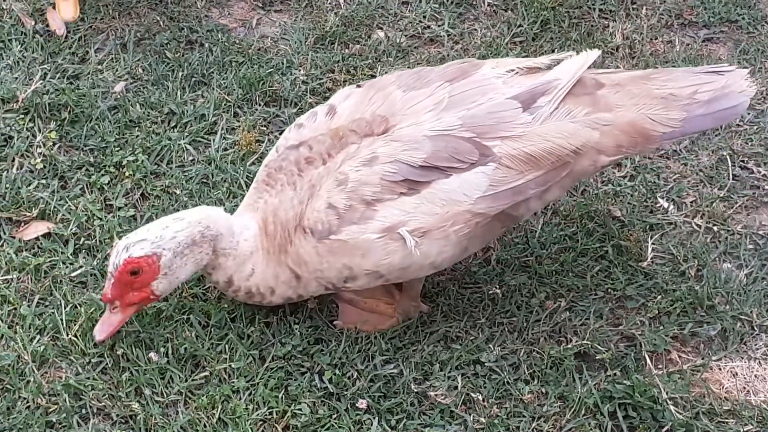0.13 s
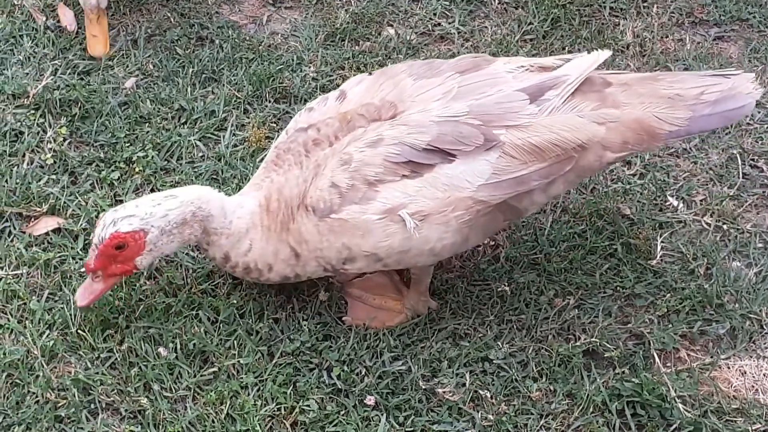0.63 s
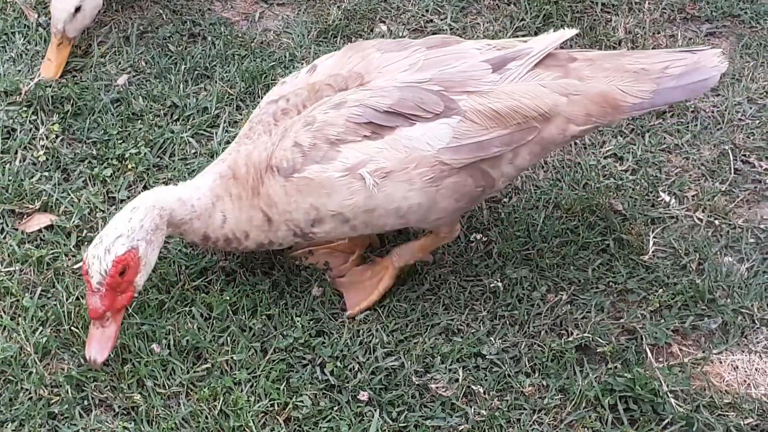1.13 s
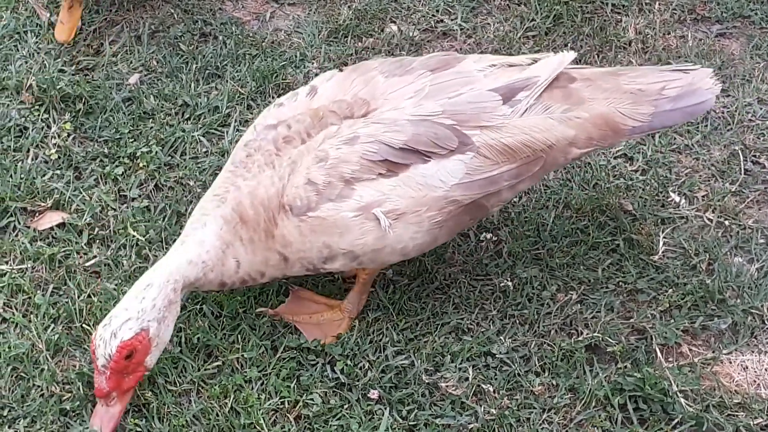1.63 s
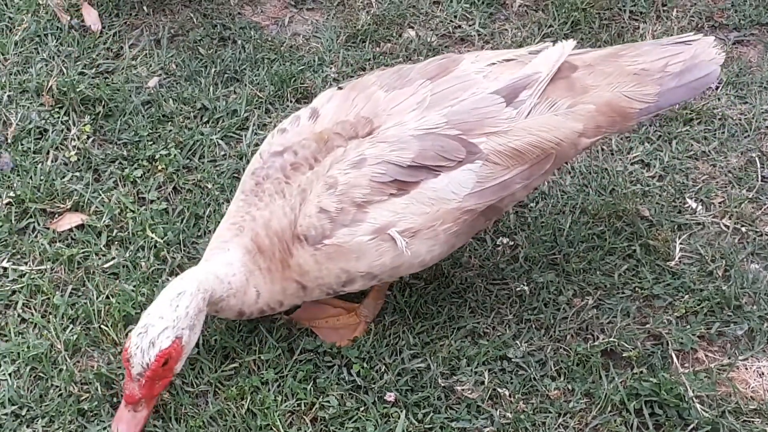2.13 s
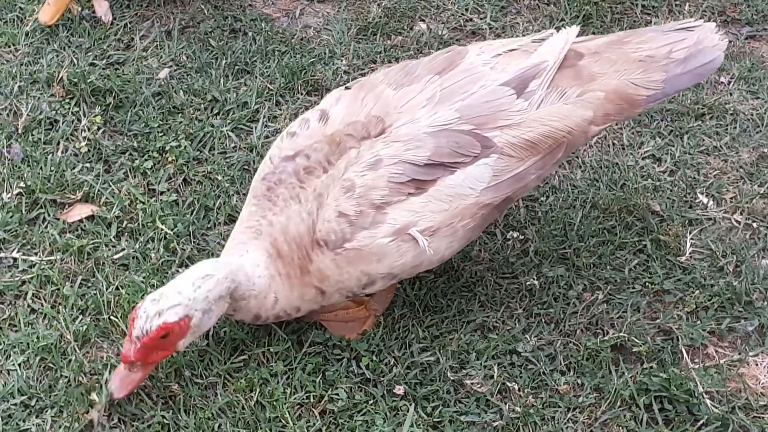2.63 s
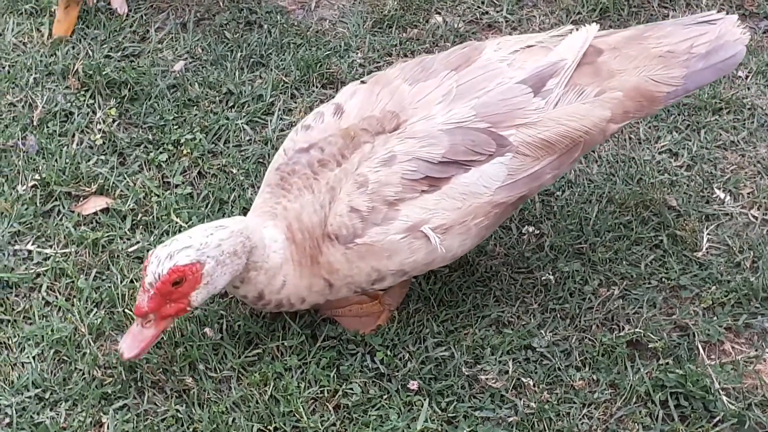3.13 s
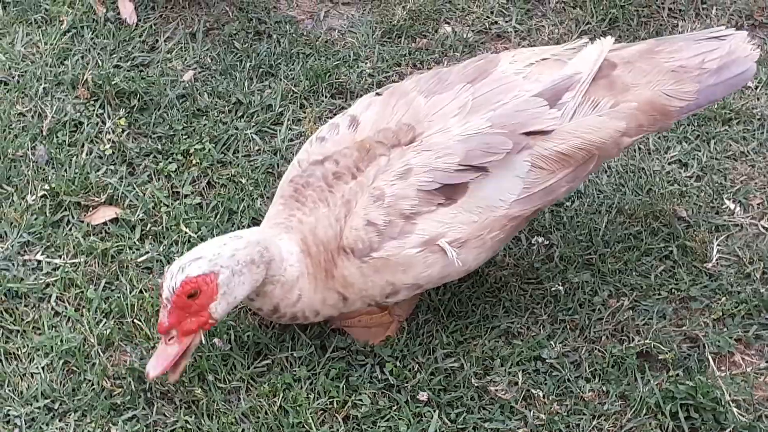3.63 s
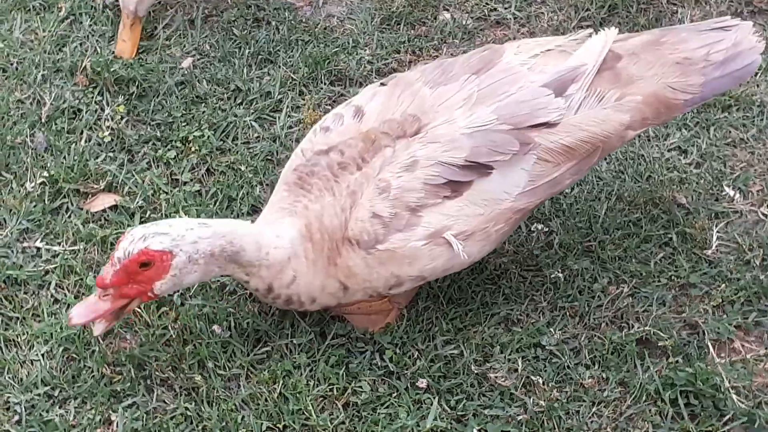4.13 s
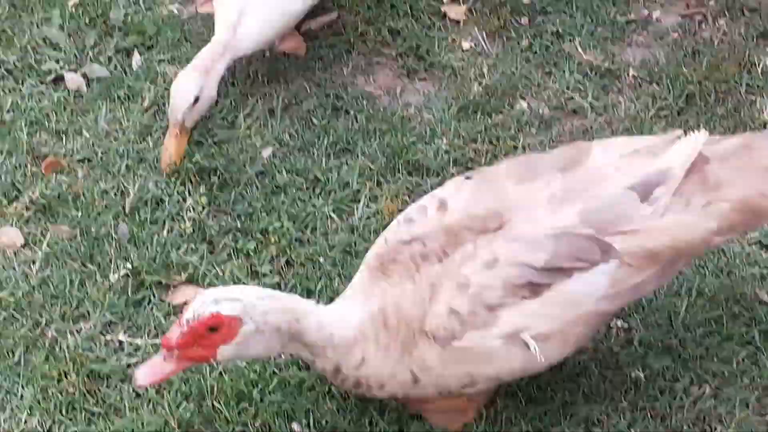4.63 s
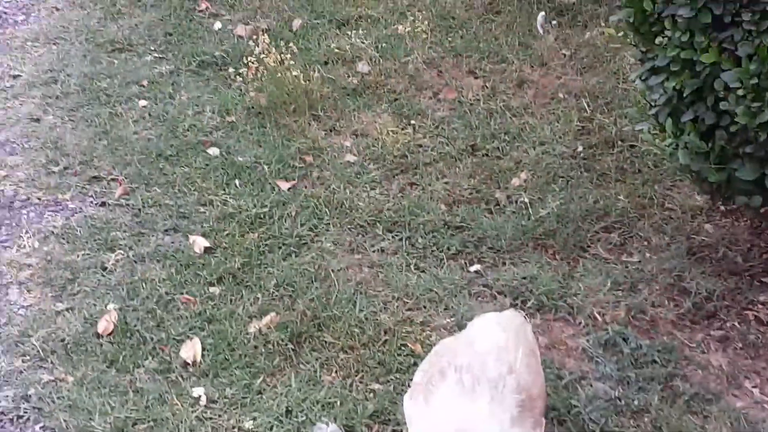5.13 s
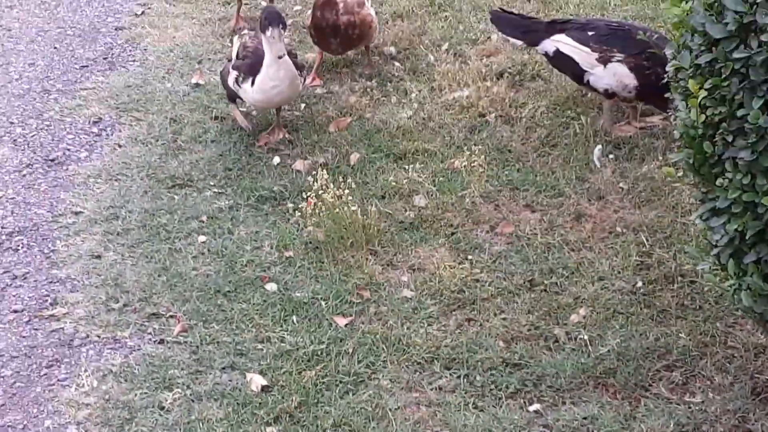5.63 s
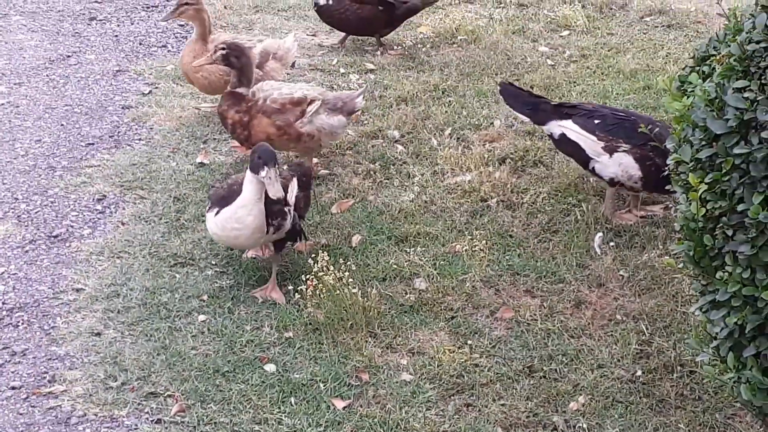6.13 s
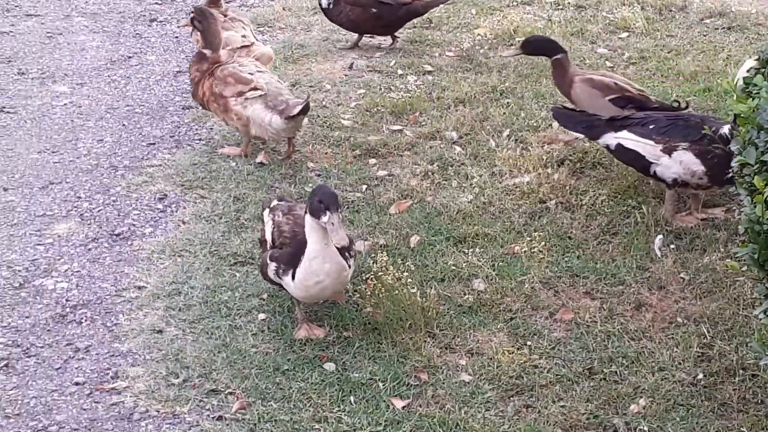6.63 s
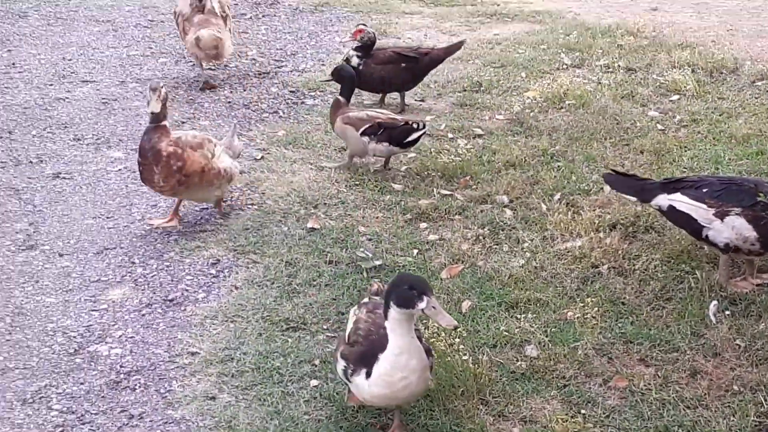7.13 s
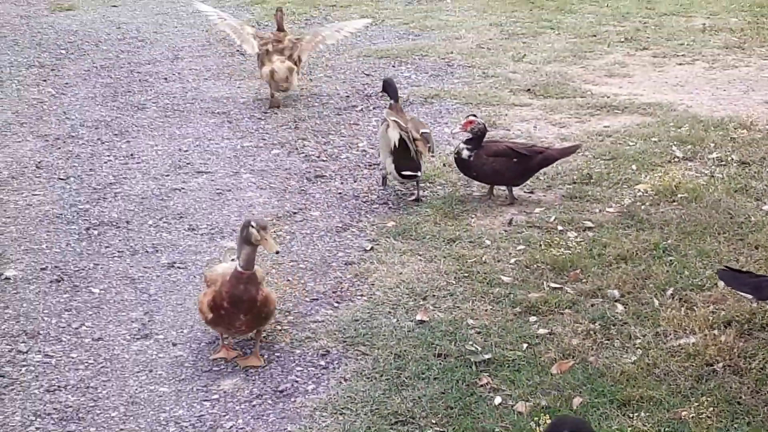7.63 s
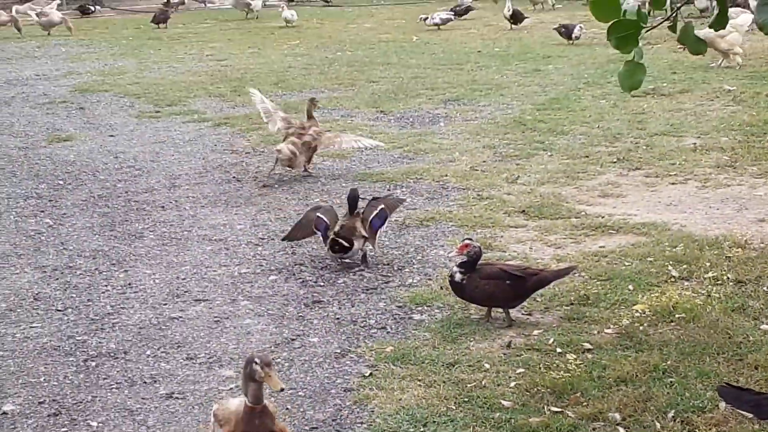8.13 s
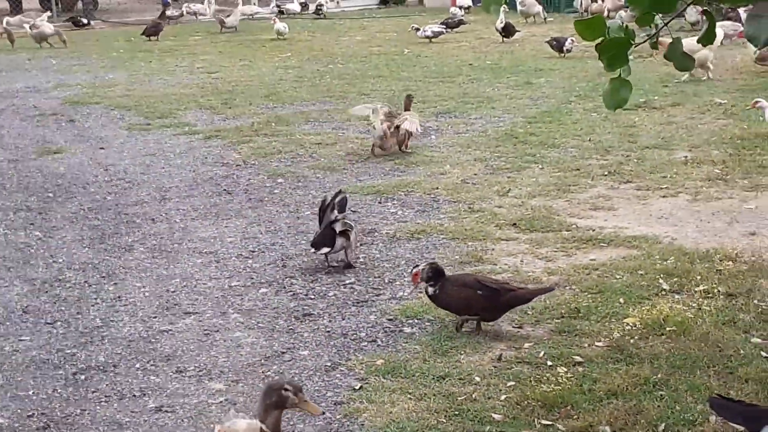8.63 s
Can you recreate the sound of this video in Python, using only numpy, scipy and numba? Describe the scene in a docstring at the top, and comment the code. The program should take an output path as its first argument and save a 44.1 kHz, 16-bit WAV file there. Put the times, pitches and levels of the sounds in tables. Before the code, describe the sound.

Wind buffets the microphone in low thumps while ducks rasp hoarsely and quack on a lawn, then two louder nasal quacks ring out.

```python
"""Ducks on a lawn: drakes rasp softly, near and far, and two hens quack, one near and one far.
Membrane pulses and gated air ring the throat and bill of each duck; grass, bushes and fences scatter the calls.
Gusts buffet the two microphone ports separately, as moving bands of noise and single pressure lumps.
Grass and bills tick in short crackles with a bright ring, a small bird chips in warbled sines, a dove coos
in wavering ones. Behind them far traffic swells under the hiss of leaves, both shaped from noise."""
import sys
import numpy as np
from scipy import signal
from scipy.fft import rfft, irfft, next_fast_len
from scipy.io import wavfile
from scipy.ndimage import uniform_filter1d
from numba import njit

SR = 44100
rng = np.random.default_rng(int(sys.argv[2]) if len(sys.argv) > 2 else 0)


def bounce(signal):
    """Save signal as a 16-bit WAV file at the path given by the first command-line argument."""
    frames = np.transpose(np.atleast_2d(signal))
    limited = np.clip(frames, -1, 1)
    pcm = np.round(limited * 32767).astype(np.int16)
    wavfile.write(sys.argv[1], SR, pcm)


def volts_from_db(level):
    """Convert decibel levels to linear amplitude ratios."""
    exponent = np.asarray(level, float) / 20
    return 10 ** exponent


N = 386668
TIME = np.arange(N) / SR
SIDES = np.array([[1], [-1]])  # left port, right port

# quacks of the near and the far hen:
# (full voice from [s], hold [s], level [dB], throat [Hz], treble against the throat [dB], pitch [Hz])
NEAR_QUACKS = [(1.215, 0.029, -38.5, 1510, -10.5, 215.8), (1.635, 0.045, -34, 1600, -12.5, 227),
               (3.76, 0.013, -35.5, 1510, -16, 218.3), (3.915, 0.036, -37, 1590, -10, 227),
               (4.045, 0.021, -35.5, 1500, -9.5, 216.2), (4.3, 0.0596, -26, 1490, -13.5, 226.6),
               (4.556, 0.0637, -27, 1480, -14, 226.3)]
FAR_QUACKS = [(7.048, 0.064, -22, 1670, -17.5, 256.8), (7.324, .068, -23, 1640, -24, 254.7)]
# voice of the far hen: (time [s], weakening of every second pulse [0-1], roughness [0-1])
FAR_VOICING = [(7.04, .2, .5), (7.062, .55, .3), (7.08, .06, .04), (7.115, .03, .05), (7.13, 0, .4),
               (7.31, 0, .4), (7.33, .1, .12), (7.36, .03, .04), (7.39, .1, .08), (7.42, .2, .6)]
# voice of the near hen: (time [s], weakening of every second pulse [0-1])
NEAR_PAIRING = [(4.1, .5), (4.29, .25), (4.34, .6), (4.54, .1), (4.575, .25), (4.59, .6)]
# near rasps, and at 4.2 s one short quack of the near hen voiced like them: (full voice from [s], hold [s],
# level [dB], throat [Hz], treble against the throat [dB])
RASPS = [(.855, 0.022, -41, 1850, -6), (1.116, 0.039, -44.5, 1820, -4.5), (1.4, 0.025, -38.5, 1770, -10.5),
         (1.802, 0.031, -43.5, 1900, -6), (2.035, 0.042, -53, 2080, -4), (2.278, 0.052, -49.5, 2060, -7.5),
         (2.395, 0.039, -52.5, 1720, -21), (2.582, 0.044, -47, 2090, -5.5), (2.632, 0.04, -42.5, 1840, -6),
         (2.832, 0.086, -45, 1970, -7), (3.133, 0.076, -49, 1985, -2), (3.357, 0.067, -39, 1904, -8),
         (3.44, 0.058, -48.5, 2200, 0.5), (3.66, 0.072, -42, 2040, -6), (3.88, 0.1, -40.5, 1953, -7.5),
         (4.11, 0.033, -49.5, 2114, -2.5), (4.2, 0.053, -40.5, 1810, -8.5),
         (4.507, 0.041, -44, 1700, -15.5), (8.09, 0.022, -46, 1920, -16)]
# far rasps, with the hoarse air that leads into and trails after the far quacks:
# (full voice from [s], hold [s], level [dB], throat [Hz], treble against the throat [dB])
DISTANT_RASPS = [(5.072, 0.021, -49.5, 1607, -9.5), (5.21, .07, -64.5, 2320, -10.5),
                 (5.292, 0.036, -55.5, 1610, 2.5), (5.612, 0.033, -58.5, 1590, 0.5),
                 (6.2, 0.036, -60, 1150, -20), (6.385, .035, -56, 1050, -18), (7.0, 0.04, -45.5, 1973, -21),
                 (7.02, 0.083, -43, 997, -29), (7.125, .04, -42, 1800, -15),
                 (7.298, .016, -42.5, 1780, -21), (7.41, 0.056, -47, 1750, -12),
                 (7.858, 0.025, -51, 1620, -5.5), (8.375, 0.035, -53.5, 1850, -3)]
# resonances of each voice beside the main throat band, low and high:
# (centre [Hz], width [Hz], level [dB])
NEAR_LOW = [(2350, 380, -7), (1880, 380, -5), (1300, 220, -2), (240, 150, -22), (850, 600, -18)]
NEAR_HIGH = [(3650, 900, -2), (4400, 1500, 0), (5600, 900, 0), (6200, 700, 0), (11500, 6000, -30)]
FAR_LOW = [(2330, 130, -19.5), (1350, 130, -5), (260, 215, -26), (540, 300, -28.5), (820, 300, -30)]
FAR_HIGH = [(3900, 930, -1), (4440, 720, 1), (4800, 820, -4.5)]
DRAKE_LOW = [(2350, 400, -2), (1600, 300, -5)]
DRAKE_HIGH = [(3200, 430, 0.73), (4080, 307, 2), (5000, 1370, -0.25), (5630, 700, -1.7)]
DISTANT_HIGH = [(1960, 260, 0), (2550, 320, 3), (3050, 400, -2)]
# how each voice shapes a call: (attack [s], release [s], drop at both ends [dB], sag while held [dB],
#  throat rise across the call [share], pitch fall in the release, half of it at the onset [share])
NEAR_HEN = (0.03, 0.042, 18.13, 1.4, 0.066, 0.022)
FAR_HEN = (0.016, 0.036, 15, -2.5, -.02, 0.82)
DRAKE = (.018, 0.06, 15.4, 5, 0.06, .01)
FAR_DRAKE = (0.022, 0.059, 26, 1.3, 0.019, .01)
# gusts that buffet one port: (start [s], hold [s], level [dB], port [0 left, 1 right])
GUSTS = [(0.0, 0.09, -20, 1), (0.01, 0.078, -40, 0), (0.491, 0.086, -34, 0), (.56, 0.021, -33, 1),
         (0.706, 0.017, -42, 1), (0.829, 0.026, -38, 0), (0.883, 0.0067, -25, 1), (1.003, 0.072, -26.5, 1),
         (1.132, 0.16, -24, 0), (1.133, 0.19, -30.5, 1), (1.351, 0.063, -26.5, 0), (1.367, 0.031, -30, 1),
         (1.447, 0.053, -21, 0), (1.5, 0.14, -31, 1), (1.56, 0.12, -32, 0), (1.626, 0.051, -27, 1),
         (1.842, 0.1, -36, 1), (2.203, 0.1, -40, 1), (2.363, 0.22, -28, 1), (2.583, 0.089, -20, 1),
         (2.697, 0.062, -33.5, 1), (3.097, 0.23, -30, 0), (3.334, 0.08, -20.5, 1), (3.386, 0.066, -30, 0),
         (3.511, 0.061, -32, 1), (3.581, 0.13, -26.5, 0), (3.742, 0.23, -27, 0), (3.796, 0.153, -19.5, 1),
         (3.992, 0.097, -22.5, 0), (4.012, 0.076, -17.5, 1), (4.128, 0.0328, -19, 0),
         (4.116, 0.134, -21.5, 1), (4.22, 0.22, -28.5, 0), (4.323, 0.12, -30.5, 1),
         (4.542, 0.0395, -34.5, 1), (4.555, 0.032, -44, 0), (4.74, 0.058, -37.5, 1),
         (4.746, 0.0106, -37.5, 0), (4.862, 0.12, -39, 0), (4.857, 0.11, -36.5, 1), (5.099, 0.062, -40, 1),
         (5.39, 0.009, -32.5, 1), (5.827, 0.09, -36.5, 0), (5.871, 0.059, -32.5, 1),
         (5.443, 0.085, -48.5, 1), (5.988, 0.0263, -31.5, 0), (5.998, 0.0426, -36.5, 1),
         (6.213, 0.043, -40.5, 0)]
# strongest eddies: (time [s], level [dB], pitch [Hz], port [0 left, 1 right])
POPS = [(0.036, -4, 253.4, 1), (0.077, -9, 267, 1), (0.098, -8.5, 328, 1), (1.039, -10.5, 289, 1),
        (1.167, -12, 250, 0), (1.263, -7, 297, 0), (1.29, -10.5, 272, 0), (1.389, -13.5, 159, 0),
        (1.451, -8.5, 200, 0), (1.478, -11, 147, 0), (2.522, -15.5, 246, 1), (2.66, -13, 216, 1),
        (3.193, -17, 253, 0), (3.339, -3, 250, 1), (3.415, -13.5, 226, 1), (3.84, -7.5, 207, 1),
        (3.888, -8.5, 325, 1), (3.957, -6, 288, 1), (4.011, -16, 242, 0), (4.041, -4, 291.4, 1),
        (4.058, -10, 186, 1), (4.153, -5, 237, 0), (4.186, -3.5, 261, 1), (4.205, -4, 290, 1),
        (4.216, 4.5, 296, 1), (4.239, -4, 266, 1), (4.27, -17, 330, 1), (4.385, -9, 217, 1),
        (5.879, -21, 184, 1), (5.896, -16.5, 138, 0)]
# light breeze between the gusts: (time [s], left port level [dB], right port level [dB])
BREEZE = [(0, -52, -57.5), (.9, -45, -42.5), (2, -50.5, -44.5), (3, -49.5, -49.5), (4.6, -48, -40),
          (5.2, -68, -52), (5.7, -65, -59.5), (6.2, -67, -53), (6.6, -50.5, -56), (7, -62, -59.5),
          (7.8, -46, -54), (8.3, -57, -51.5), (8.77, -81, -48)]
# dry ticks: (time [s], level [dB], ring [Hz], left minus right [dB])
TICKS = [(0.3167, -50, 4600, -7), (2.6286, -31.5, 15700, 9), (2.6766, -31, 6260, 8),
         (2.6794, -32.5, 15800, -8), (2.7225, -41.5, 4780, -2), (3.175, -42, 5540, 4),
         (5.6007, -49.5, 3130, 11.5), (5.947, -38, 3830, -0.5), (6.1448, -45, 4300, 0),
         (6.1799, -44.5, 3850, -1), (6.2542, -49, 4470, 1.5), (6.3642, -39, 4580, -2),
         (6.469, -47, 4800, -4), (6.5866, -27, 14800, -1), (6.5964, -32, 4700, -0.5),
         (6.6061, -33, 5170, 9), (6.785, -46, 3200, 12.5), (6.8404, -45, 5000, 3), (7.7255, -50.5, 4440, 2),
         (7.9424, -51, 4270, 6), (8.33, -43, 6960, 9)]
# small bird: (time [s], level [dB], pitch [Hz], left minus right [dB])
CHIPS = [(0.408, -56, 7380, 10), (1.111, -56, 7500, 10), (2.7227, -57, 6900, 24), (3.2195, -58, 7600, 12),
         (3.6853, -52, 7760, 16), (3.7594, -61, 7680, 14), (4.472, -54.5, 7470, 6), (6.314, -65.5, 7500, 4),
         (8.047, -57.5, 7660, 9), (8.5714, -56, 7810, 7)]
# dove: (start [s], length [s], first pitch [Hz], last pitch [Hz], level [dB])
COOS = [(0.147, 0.31, 225, 235.5, -60), (2.11, 0.32, 215, 225.3, -61), (4.808, 0.13, 334, 310.4, -52),
        (7.497, 0.182, 309.7, 325.3, -51.5), (7.704, 0.064, 322, 267, -51)]
# far traffic: (time [s], level [dB])
TRAFFIC = [(0.0, -54), (0.34, -59), (1.17, -55), (2.15, -60.5), (4.2, -58.5), (5.08, -63), (6.93, -56),
           (7.2, -50.5), (7.74, -55), (8.77, -46)]
# spectrum of the traffic: (frequency [Hz], relative level per Hz [dB])
TRAFFIC_COLOUR = [(150, 3.5), (260, 8), (286, 5), (320, 5.5), (633, 3), (934, 2), (1070, 4), (1210, -2.5),
                  (1650, -2), (2500, -12.5), (3250, -40), (5500, -120)]
# hiss of the leaves: (time [s], level [dB])
YARD_LEVEL = [(0, -55), (.6, -57), (1.05, -55.5), (1.5, -52), (2.1, -58), (2.7, -52), (3.1, -55.5),
              (3.58, -56.5), (4.0, -58), (4.45, -54), (4.9, -56.5), (5.5, -56.5), (6.1, -55), (6.6, -55.5),
              (7.2, -52.5), (7.9, -55.5), (8.77, -54.5)]
# spectrum of that hiss: (frequency [Hz], relative level per Hz [dB])
YARD = [(100, -54), (170, 0), (337, 5.5), (721, -8), (808, -22), (1050, -24), (1300, -5.5), (1830, -6),
        (3120, -8), (5110, -7), (8220, -17), (9040, -35.5), (14300, -17), (16000, -16)]
# thin high hiss of leaves or insects: (time [s], level [dB])
RUSTLE = [(0.0, -70), (0.17, -74), (0.9, -73.5), (1.39, -67), (1.88, -64.5), (2.07, -71), (2.34, -75),
          (2.66, -64.5), (4.25, -73.5), (5.1, -72.5), (5.3, -60), (5.52, -70), (6.13, -70.5), (7.06, -65),
          (7.72, -70), (8.6, -66.5), (8.77, -68)]

# side pocket and pipe of the windpipe, top of the bill's body sound
POCKET_HZ, POCKET_WIDTH_HZ, BILL_TOP_HZ, PIPE_HZ = 2950, 800, 2750, 1200
ARCH_DB, ARCH_SHARE = 0.87, .012  # level and pitch crest in the middle of a call
UNSTEADY_DB, THROAT_WANDER = 2, .035  # how far a fully rough voice strays in level and throat size (rms)
TREBLE_RIGHT = 0.14  # share of a call's treble taken from the left port and added to the right
GRASS_T60_S, GRASS_DB = .03, -5.5
ECHO_T60_S, ECHO_DB = .45, -16.5
GUST_RISE_DB_S, GUST_FALL_DB_S = 701, 449
EDDY_OVER_DB, EDDY_SPREAD_DB = 6, 3  # lesser eddies: least level above the moving air, scale of the excess


def hens():
    """Nasal quacks: the near hen in rough strong-weak pairs, the far one settling into clean pulses."""
    even = np.ones(N)
    pairing = np.interp(TIME, *np.transpose(NEAR_PAIRING))
    near = duck(shaped(NEAR_QUACKS, *NEAR_HEN), 0, pairing, .32 * even,
                NEAR_LOW, NEAR_HIGH, width_hz=374, breath=1.0, puff=0.28)
    s, weak, rough = np.transpose(FAR_VOICING)
    far = duck(shaped(FAR_QUACKS, *FAR_HEN), 0, np.interp(TIME, s, weak), np.interp(TIME, s, rough),
               FAR_LOW, FAR_HIGH, width_hz=390, breath=1.0, puff=0.7)
    return near + far


def drakes():
    """Hoarse rasps: slow uneven slaps, each a burst of air; the distant ones are thinner."""
    even = np.ones(N)
    near = duck(shaped(RASPS, *DRAKE), 95, 0 * even, .8 * even,
                DRAKE_LOW, DRAKE_HIGH, width_hz=520, breath=3, puff=.25, swell=1, sweep=.4)
    far = duck(shaped(DISTANT_RASPS, *FAR_DRAKE), 110, 0 * even, even,
               [], DISTANT_HIGH, width_hz=320, breath=3.4, puff=0.99)
    return near + far


def shaped(rows, attack_s, release_s, ends_db, sag_db, rise, fall):
    """Each call swells, holds and dies away as the throat slides and the pitch drops at the end."""
    calls = []
    for s, hold, db, hz, treble_db, *pitch in rows:
        # short calls stop sooner
        stop_s = s + hold + release_s * min(hold / .035, 1) ** .5
        calls.append([
            (s - attack_s, db - ends_db, hz * (1 - rise), treble_db - 2.5, *[p * (1 - fall / 2) for p in pitch]),
            (s, db, hz * (1 - rise / 2), treble_db, *pitch),
            (s + hold / 2, db - sag_db / 2 + ARCH_DB, hz, treble_db, *[p * (1 + ARCH_SHARE) for p in pitch]),
            (s + hold, db - sag_db, hz * (1 + rise / 2), treble_db, *pitch),
            (stop_s, db - sag_db - ends_db, hz * (1 + rise), treble_db - 0.5, *[p * (1 - fall) for p in pitch])])
    return calls


def duck(calls, steady_hz, weak, rough, low, high, width_hz, breath, puff, swell=0, sweep=0):
    """Membrane pulses and air gated by each cycle ring the moving throat and the bill, call by call."""
    out = np.zeros((2, N))
    wander = 1 + THROAT_WANDER * rough * walk(25)
    effort = volts_from_db(UNSTEADY_DB * np.sqrt(rough) * walk(45))
    pipe = signal.butter(4, PIPE_HZ, "high", fs=SR, output="sos")
    bill = signal.butter(4, BILL_TOP_HZ, fs=SR, output="sos")
    for call in calls:
        s, db, throat_hz, treble_db, *pitch = np.transpose(call)
        span = slice(int(s[0] * SR), int(s[-1] * SR))
        t = TIME[span]
        hz = np.interp(t, s, pitch[0]) if pitch else steady_hz + 0 * t
        pulses, phase = flaps(hz, .15 * rough[span], weak[span], rng.standard_normal((200, 2)))
        air = unit(phase ** swell * np.exp(-phase / puff) * rng.standard_normal(len(t)))
        source = unit(pulses) + breath * rough[span] * air
        # slack membranes part slowly, so the ring climbs within each cycle
        climb = 1 + sweep * (phase - .25)
        # the narrow windpipe passes little below its cut-off
        piped = signal.sosfilt(pipe, source)
        throat = np.interp(t, s, throat_hz)
        glide = throat / np.mean(throat_hz)
        body = band(piped if throat_hz[0] > PIPE_HZ else source, throat * wander[span] * climb, width_hz)
        for f, width, g in low:
            body = body + volts_from_db(g) * band(piped if f > PIPE_HZ else source, f * glide * climb, width)
        # a side pocket of the windpipe swallows a narrow band above the throat
        body = body - svf(body, POCKET_HZ + 0 * t, POCKET_WIDTH_HZ + 0 * t)
        # the body sound fades above the throat band as it leaves the open bill
        body = signal.sosfilt(bill, body)
        # turbulence is stronger in the treble; the upper resonances slide with the throat
        slide = wander[span] * glide ** 0.37
        top = unit(sum(volts_from_db(g) * band(source + 10.0 * air, f * slide, width) for f, width, g in high))
        edges = np.clip(np.minimum(t - s[0], s[-1] - t) / 0.00072, 0, 1)
        loudness = edges * effort[span]
        treble = volts_from_db(np.interp(t, s, treble_db)) * top
        voice = loudness * volts_from_db(np.interp(t, s, db)) * (unit(body) + treble)
        moved = loudness * volts_from_db(np.interp(t, s, db + treble_db)) * TREBLE_RIGHT * -SIDES * top
        out[:, span] += voice + moved
        # the ground and the bodies nearby scatter each call in its own way, as the birds move
        near_scatter = signal.fftconvolve(scatter(GRASS_T60_S, GRASS_DB, 0), voice[None])
        add(out, s[0], near_scatter, 0)
    return out


@njit
def flaps(hz, jitter, weak, chance):
    """One pulse each time the membranes slap shut; every second one may be weaker."""
    pulses, phase, p, k = np.zeros(len(hz) + 1), np.empty(len(hz)), 0., 0
    for i in range(len(hz)):
        step = hz[i] * np.exp(jitter[i] * chance[k, 0]) / SR
        p += step
        if p >= 1:
            p, k = p - 1, k + 1
            size = (1 - weak[i] * (k % 2)) * np.exp(2 * jitter[i] * chance[k, 1])
            # split between two samples, so the slap falls between them
            pulses[i] += size * p / step
            pulses[i + 1] += size * (1 - p / step)
        phase[i] = p
    return pulses[:-1], phase


def scatter(t60_s, db, after_s):
    """A decaying cloud of reflections, different at each port."""
    t = np.arange(int(t60_s * SR)) / SR
    cloud = rng.standard_normal((2, len(t))) * np.exp(-np.log(1000) * t / t60_s) * (t >= after_s)
    return volts_from_db(db) * cloud / np.sqrt(np.sum(cloud ** 2, axis=1, keepdims=True))


def wind():
    """Eddies roll over each port alone: faster air is louder and brighter."""
    s, *ports = np.transpose(BREEZE)
    air_db = np.array([np.interp(TIME, s, curve) for curve in ports])
    for s, hold, db, port in GUSTS:
        rise = np.maximum(GUST_RISE_DB_S * (s - TIME), 0)
        fall = np.maximum(GUST_FALL_DB_S * (TIME - s - hold), 0)
        air_db[round(port)] = np.maximum(air_db[round(port)], db - rise - fall)
    out = np.zeros((2, N))
    for port, curve in zip(out, air_db):
        db = curve - 1.5 + 4 * walk(50) + walk(12)
        hz = 70 * volts_from_db(0.16 * np.clip(db + 36.0, -10, 35))
        noise = rng.standard_normal(N)
        # eddies smaller than the port cancel, so the top edge is steep
        rumble = svf(band(noise, hz, 1.71 * hz), hz, 3.45 * hz)
        port += volts_from_db(db) * rumble / np.sqrt(hz * 2.28 / SR)
    lesser = []
    for at, e, f, p in rng.random((250, 4)):
        s = .05 + 8.6 * at
        db = air_db[round(p), int(s * SR)] + EDDY_OVER_DB - EDDY_SPREAD_DB * np.log(1 - e)
        lesser.append((s, db, 106.35 + 150 * f, p))
    turn = rng.uniform(0, 2 * np.pi, (len(POPS) + len(lesser), 1))
    for (s, db, hz, port), angle in zip([*POPS, *lesser], turn):
        # each eddy carries a smaller, sharper one at its front
        for f, g in [(hz, db), (2.34 * hz, db - 18.5)]:
            lump, i = eddy(f, angle), int(s * SR - 1.5 * SR / f)
            out[round(port), i:i + len(lump)] += volts_from_db(g) * lump
    return out


def eddy(hz, angle):
    """About one and a half cycles of pressure, steeper in front."""
    cycles = np.arange(-int(1.5 * SR / hz), int(3 * SR / hz)) * hz / SR
    decay = np.where(cycles < 0, (cycles / 0.26) ** 2, (np.hypot(cycles, .1) - .1) / 0.6)
    return np.cos(2 * np.pi * cycles + angle) * np.exp(-decay)


def ticks():
    """Grass and bills tick: each tick is a short crackle with a brief bright ring; many faint ones at random."""
    out, t = np.zeros((2, N)), np.arange(900) / SR
    faint = rng.random((500, 4)) * [8.7, 8, 11000, 10] + [.01, -68, 2500, -2]  # same columns as TICKS
    for s, db, hz, pan_db in [*TICKS, *faint]:
        # the crackle differs at each port
        crackle = np.diff(rng.standard_normal((2, len(t) + 1)))
        crackle = crackle * np.exp(-t / .003) * np.minimum(t / .003, 1) ** 2
        ring = np.sin(2 * np.pi * hz * t) * np.exp(-np.abs(t - .003) / .0002)
        add(out, s - .003, volts_from_db(db) * (.9 * crackle + 1.2 * ring), pan_db)
    return out


def chips():
    """Short warbled whistles of a small bird, each with a fainter repeat."""
    out, t = np.zeros((2, N)), np.arange(int(0.026 * SR)) / SR
    warble = np.sin(2 * np.pi * 95 * t)
    for s, db, hz, pan_db in CHIPS:
        phase = 2 * np.pi * np.cumsum(hz * (1 + 0.013 * warble)) / SR
        chip = np.abs(np.sin(np.pi * t / t[-1])) * np.sin(phase)
        add(out, s - .006, volts_from_db(db) * chip, pan_db)
        add(out, s + 0.016, volts_from_db(db - 10) * chip, pan_db)
    return out


def dove():
    """A soft near-sine, wavering in pitch and level."""
    out, waver, swell = np.zeros(N), 1 + .04 * walk(50), volts_from_db(3.5 * walk(25))
    for s, length, from_hz, to_hz, db in COOS:
        gate = np.clip(np.minimum(TIME - s, s + length - TIME) / 0.0117, 0, 1)
        hz = np.interp(TIME, [s, s + length], [from_hz, to_hz]) * waver
        phase = 2 * np.pi * np.cumsum(hz) / SR
        out += gate * volts_from_db(db) * swell * np.sqrt(2) * np.sin(phase)
    return out


def yard():
    """Noise beds: far traffic partly alike at both ports, the hiss of leaves unrelated."""
    swell = volts_from_db(np.interp(TIME, *np.transpose(TRAFFIC)) + walk(8.1))
    traffic = coloured(TRAFFIC_COLOUR) + 0.656 * SIDES * coloured(TRAFFIC_COLOUR)
    hiss_db = np.interp(TIME, *np.transpose(YARD_LEVEL)) + walk(5.05)
    hiss = np.array([coloured(YARD) * volts_from_db(hiss_db + 1.73 * walk(22)) for _ in range(2)])
    rustle = np.array([unit(band(rng.standard_normal(N), 11680, 9400)) * volts_from_db(2.0 * walk(25))
                       for _ in range(2)])
    rustle_db = np.interp(TIME, *np.transpose(RUSTLE)) + 2.5 * SIDES
    return swell * traffic + hiss + rustle * volts_from_db(rustle_db)


@njit
def svf(x, hz, width):
    """State-variable band-pass with moving centre and width, gain 1 at the centre."""
    y, b, l = np.empty(len(x)), 0., 0.
    for i in range(len(x)):
        g, k = np.tan(np.pi * hz[i] / SR), width[i] / hz[i]
        v = (b + g * (x[i] + 1e-18 - l)) / (1 + g * (g + k))
        b, l, y[i] = 2 * v - b, l + 2 * g * v, k * v
    return y


def band(x, hz, width):
    """A resonance applied twice, so the valleys stay dark."""
    hz, width = hz + np.zeros(len(x)), width + np.zeros(len(x))
    return svf(svf(x, hz, width), hz, width)


def unit(x):
    """Scale to rms 1."""
    return x / np.sqrt(np.mean(x ** 2))


def walk(rate):
    """Random levels held 1 / rate s and smoothed twice; rms 1."""
    k = int(SR / rate)
    held = np.repeat(rng.standard_normal(N // k + 1), k)
    return unit(uniform_filter1d(uniform_filter1d(held, k), k)[:N])


def coloured(points):
    """Noise of rms 1 with a spectrum of (frequency [Hz], relative level [dB]) points."""
    hz, db = np.transpose(points)
    size = next_fast_len(N)
    f = np.maximum(np.arange(size // 2 + 1) * SR / size, 1)
    gain = volts_from_db(np.interp(np.log(f), np.log(hz), db))
    return unit(irfft(rfft(rng.standard_normal(size)) * gain, size)[:N])


def add(out, s, sound, pan_db):
    """Place a short sound between the ports by level, left minus right in dB."""
    i = int(s * SR)
    out[:, i:i + sound.shape[-1]] += volts_from_db(SIDES * pan_db / 2) * sound[..., :N - i]


def scene():
    """Calls arrive direct and again from fences and bushes, among wind, ticks, birds and yard."""
    loud, hoarse = hens(), drakes()
    echo = signal.fftconvolve(scatter(ECHO_T60_S, ECHO_DB, .006), (loud + hoarse)[:1])[:, :N]
    birds = loud * volts_from_db(0.25 * SIDES) + hoarse * volts_from_db(-1.2 * SIDES) + echo
    # the left port hears the calls three samples earlier
    birds[1] = np.roll(birds[1], 3)
    return birds + wind() + ticks() + chips() + dove() + yard()


def low_pass(x):
    """Removes everything above the highest recorded frequency."""
    return signal.sosfilt(signal.butter(12, 15900, fs=SR, output="sos"), x)


def record(dry):
    """The bass is cut below 54 Hz and the strongest buffets are rounded."""
    bass_cut = signal.sosfilt(signal.butter(3, 54, "high", fs=SR, output="sos"), dry)
    return low_pass(np.tanh(bass_cut))


dry = scene()
out = record(dry)
bounce(out)
```